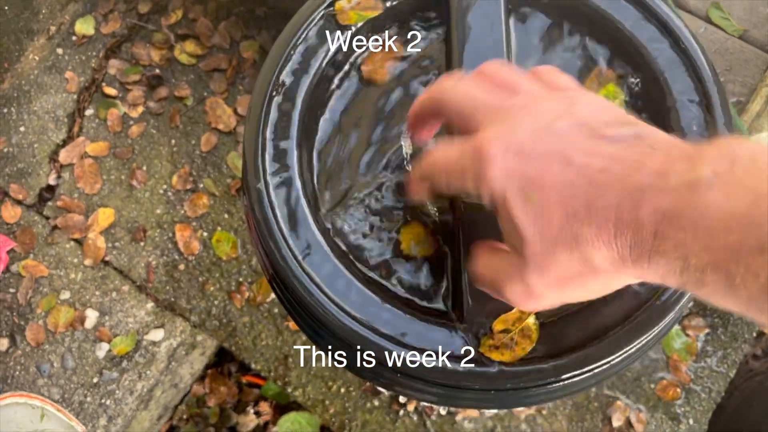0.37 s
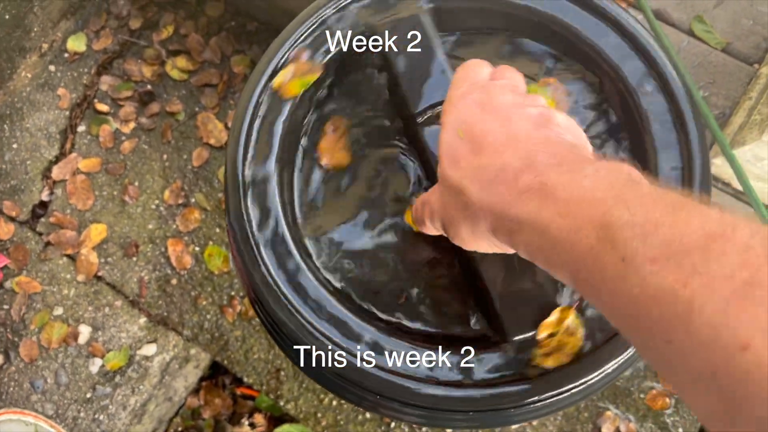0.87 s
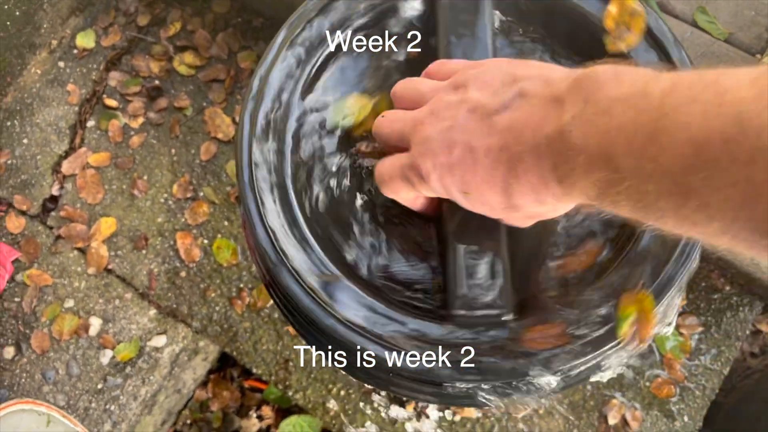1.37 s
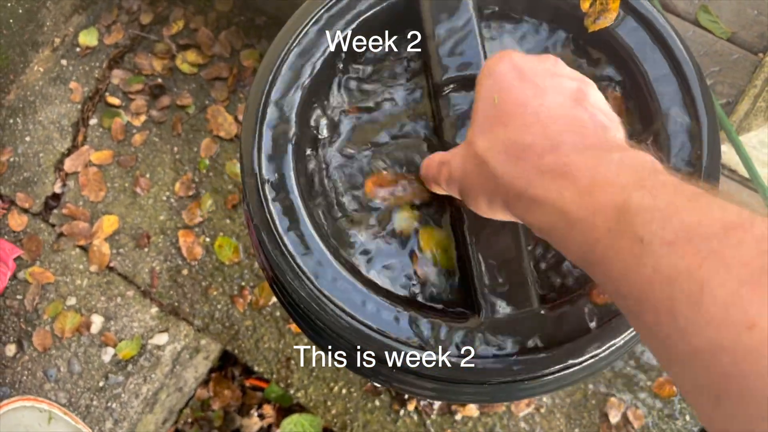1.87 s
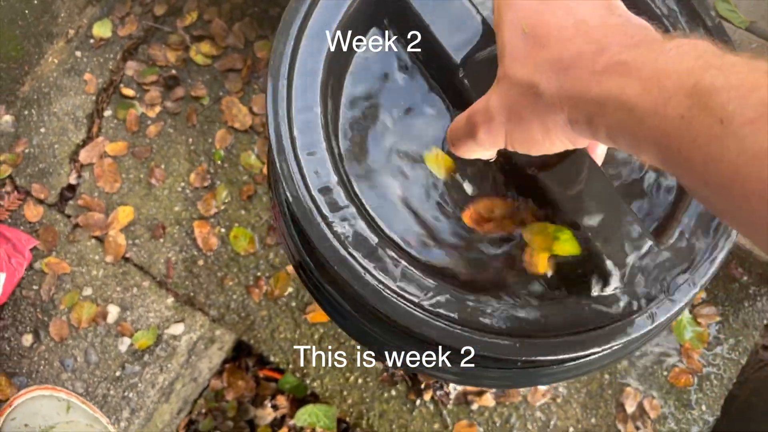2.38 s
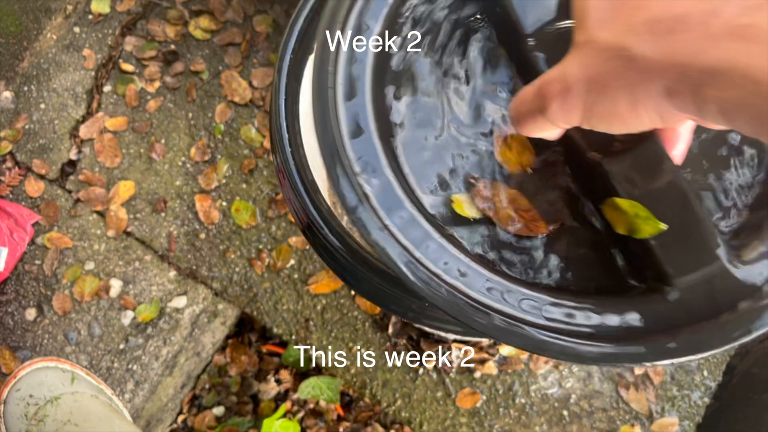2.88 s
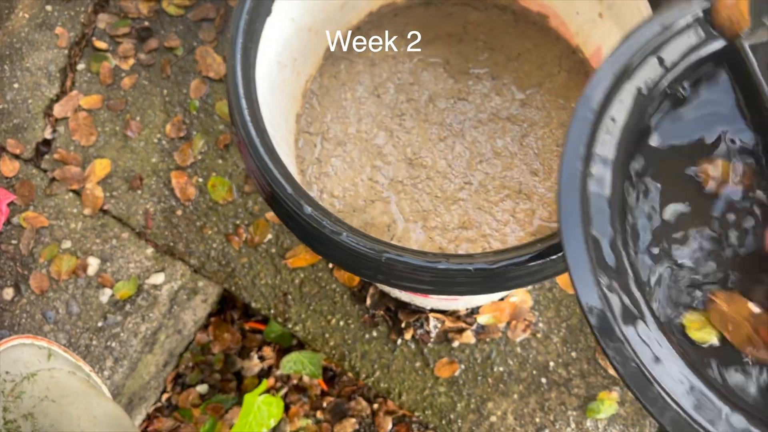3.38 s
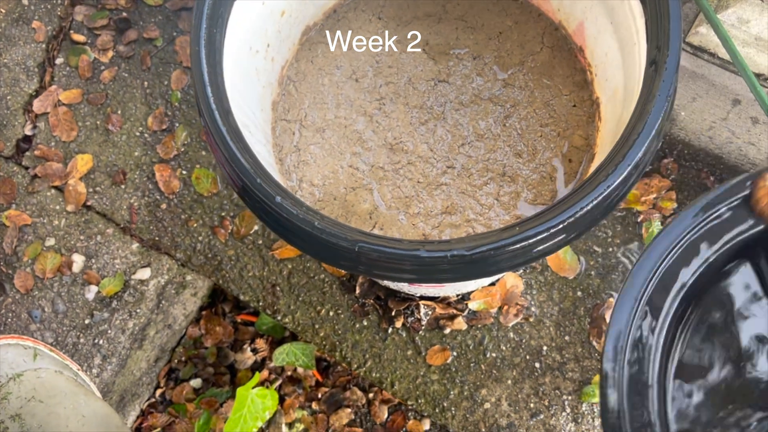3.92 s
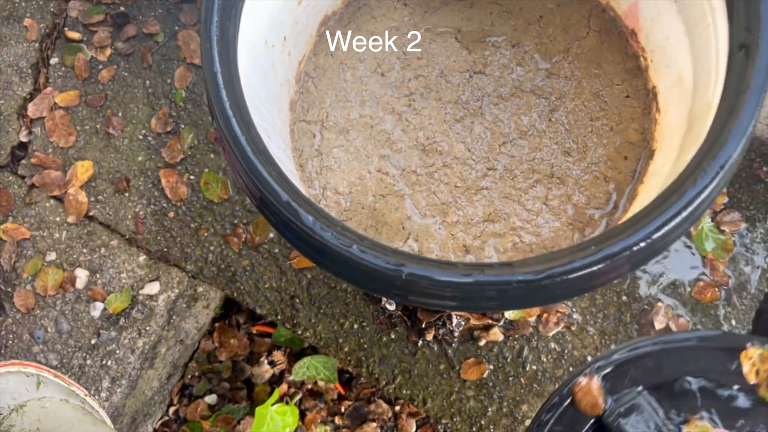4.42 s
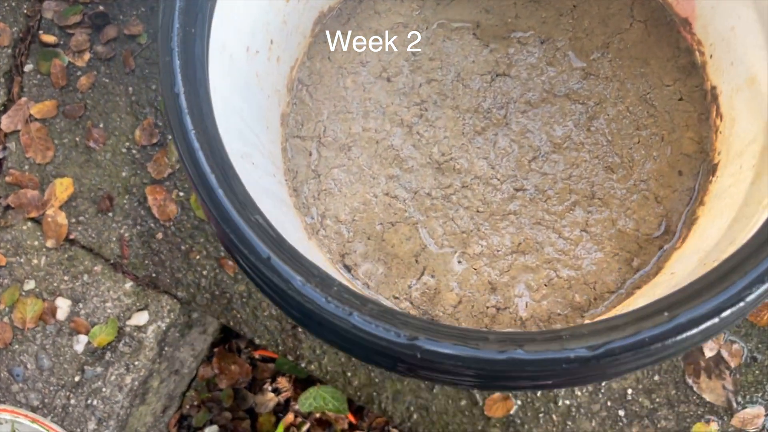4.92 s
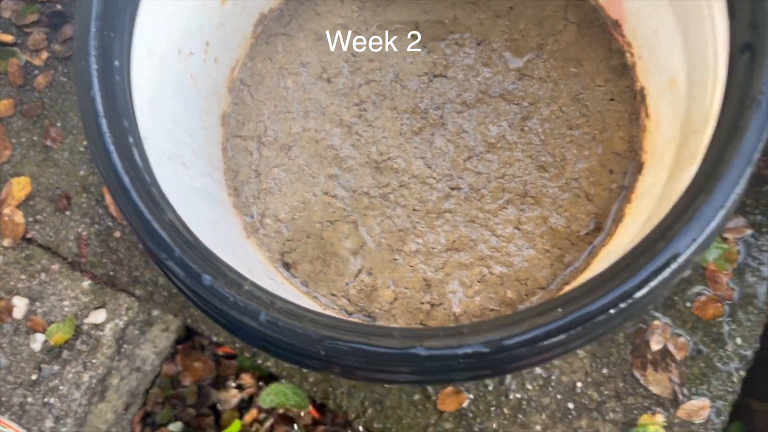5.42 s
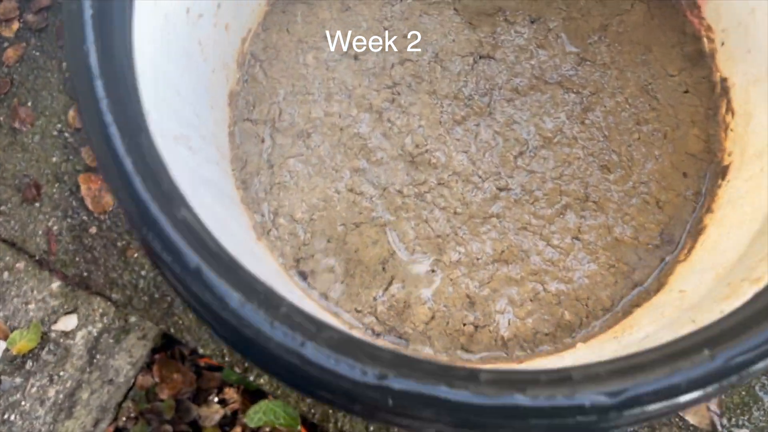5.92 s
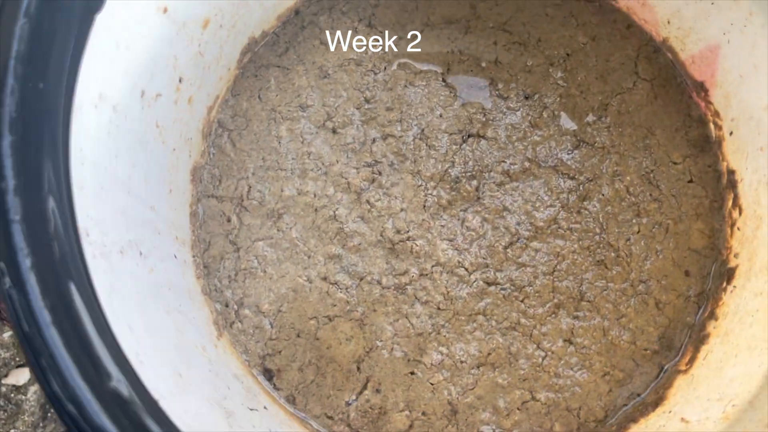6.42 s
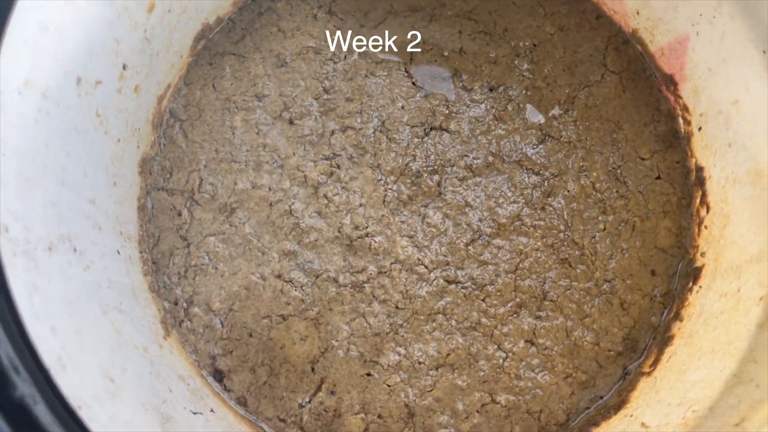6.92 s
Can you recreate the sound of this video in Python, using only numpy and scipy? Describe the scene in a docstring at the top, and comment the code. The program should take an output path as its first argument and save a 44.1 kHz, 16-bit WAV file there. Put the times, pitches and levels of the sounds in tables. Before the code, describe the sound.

Hand-held close view over a plastic bucket on wet paving, with traffic rumbling far off. Tail of a scrape and small drips first, then two quick squealing twists with drum-like thumps and splashing water. One more short rub ends in the hardest hollow knock. Water drips off the lifted lid, with a soft bump. Later the loose lid clatters and grinds on stone, settles fast, and the traffic softens.

```python
"""A wet screw lid is twisted on a plastic bucket outdoors: grit slips excite thread resonances, a sliding squeal
and bubbling water, and each knock rings the drum of the bucket and the hollow under the lid.
Water flies off and patters on wet paving as noise puffs, rising plops and sheets of crackle.
The lid drops and rattles to rest on stone: a ringing dish, rim modes, grinding grit, chatter, ticks and thuds.
Far traffic roars behind as shaped noise; two microphone ports hear the near sounds with unlike phase."""
import sys
import numpy as np
from scipy import signal
from scipy.fft import rfft, irfft
from scipy.io import wavfile
from scipy.ndimage import uniform_filter1d

SR = 44100
rng = np.random.default_rng(int(sys.argv[2]) if len(sys.argv) > 2 else 0)


def linear_from_db(decibels):
    """Turn decibels (scalar or array-like) into linear amplitude factors; 0 gives 1."""
    return 10 ** (np.asarray(decibels, float) / 20)


def generate_wav(sig):
    """Save sig (samples, or channels by samples) to the path in sys.argv[1] as 16-bit PCM at SR."""
    pcm = np.round(np.clip(np.atleast_2d(sig).T, -1, 1) * 32767).astype(np.int16)
    wavfile.write(sys.argv[1], SR, pcm)


N = 310684

# Levels in these tables are relative: the functions trim them when mixing.
# rub of the thread, one curve per twisting stroke: start_s, level_db
TWIST = [
    [(0.0, -45.5), (0.154, -60), (0.23, -72)],
    [(0.74, -69), (0.764, -55.5), (0.836, -49), (0.906, -50), (0.948, -41.5), (0.99, -45), (1.038, -39),
     (1.1, -42.5), (1.142, -58)],
    [(1.15, -56), (1.17, -55), (1.2, -49), (1.225, -50), (1.25, -44.5), (1.29, -42), (1.335, -38),
     (1.37, -45.5), (1.43, -58)],
    [(1.96, -63), (2.04, -51), (2.06, -49), (2.098, -62), (2.14, -61)],
]
# squeal of the thread, sliding with the grip: start_s, pitch_hz, level_db (against the scrape)
SQUEAL = [(0.0, 3480, -11), (0.8, 3930, -3), (0.88, 3820, -3), (0.935, 2800, -5), (0.98, 2990, -5),
          (1.02, 3610, -3.5), (1.05, 3780, 4.5), (1.085, 3400, -0.5), (1.2, 3470, -20), (1.3, 4960, -9),
          (1.34, 4830, 5), (1.4, 4400, -13), (2.04, 2950, 0)]
# thread resonances: centre_hz, width_hz (nominal), level_db (per Hz)
THREAD = [(1200, 120, 4.5), (1630, 260, 6), (2000, 240, 4), (2730, 450, 3), (3800, 840, 0.5),
          (4920, 320, 0), (6000, 1200, -6.5)]
# far traffic, what both ports share: freq_hz, level_db (per Hz)
TRAFFIC = [(20, -38), (36, -13), (70, -3.5), (110, -8.5), (150, -18.5), (236, -11.5), (310, -20),
           (420, -20), (620, -26), (800, -24), (1300, -25.5), (2000, -32), (2600, -43.5), (4000, -44.5)]
# far traffic, where the ports differ: freq_hz, level_db (per Hz)
TRAFFIC_WIDE = [(22, -6), (80, -12.5), (174, -14.5), (229, -12.5), (294, -13), (370, -13.5), (653, -8.5),
                (1300, -9), (1640, -10), (1800, -26), (2300, -29), (2700, -34), (4000, -36)]
# high background hiss, with a gap near 8 kHz and an end above 14 kHz, on the same scales:
# freq_hz, shared_db, wide_db
HISS = [(5200, -49, -41), (7400, -58, -43), (7900, -88, -43), (8700, -88, -44), (9300, -57, -47),
        (11000, -54, -52), (11800, -54, -70), (13000, -56, -54), (14300, -62, -56), (14800, -85, -62),
        (16000, -95, -85)]
# a nearer stream of traffic comes and goes: time_s, level_db
SWELL = [
    [(0, -0.5), (.7, 0.5), (1.5, 1.5), (2.9, 1), (3.4, 0.5), (3.9, 3.5), (4.4, -0.5), (5.7, -3.5),
     (6.2, -7), (7.04, -6.5)],
]
# clear drops, and snaps of the slipping thread:
# start_s, peak_db, pitch_hz (sets the puff's bands), top_db (fine treble)
PUFFS = [(0.0604, -52, 3690, -54), (0.196, -33, 3270, -63), (0.2164, -43, 3290, -63),
         (0.258, -55, 2500, -58), (0.3193, -39.5, 3630, -67), (0.357, -47, 3050, -72),
         (0.376, -46, 3630, -59), (0.44, -64, 6000, -68), (0.48, -61, 5000, -70), (0.5127, -49, 3970, -54),
         (0.538, -48, 5000, -68), (0.547, -46, 4800, -65), (0.5743, -45, 3780, -73),
         (0.61, -38.5, 5980, -64), (0.6355, -36.5, 5500, -57), (0.65, -41, 2950, -56),
         (0.9373, -30, 2690, -65), (1.0201, -33, 3580, -61), (1.035, -24.5, 3730, -59),
         (1.1925, -29, 2750, -69), (1.307, -21.5, 5170, -53), (1.3305, -19.5, 4460, -50),
         (1.374, -36, 4510, -43), (1.4456, -44, 4780, -55), (1.466, -34, 2900, -56),
         (1.473, -32.5, 4100, -45.5), (1.4852, -32.5, 3390, -47), (1.551, -40, 5640, -53),
         (1.5704, -42, 5460, -62), (1.612, -42, 7200, -41), (1.632, -43, 5940, -42),
         (1.646, -25, 4800, -38), (1.676, -34, 3900, -43), (1.695, -31, 6200, -53),
         (1.712, -28.5, 3200, -50), (1.78, -28.5, 3700, -48), (1.8088, -40, 4850, -63),
         (1.8795, -38.5, 3250, -62), (1.8914, -46, 2570, -52), (2.017, -47, 2600, -58),
         (2.0547, -25, 2680, -67), (2.075, -34, 3870, -70), (2.1304, -33.5, 6460, -43),
         (2.148, -62, 6000, -65), (2.192, -45, 2570, -51.5), (2.5, -42, 5400, -66),
         (2.622, -42.5, 6000, -64), (2.6724, -39.5, 6000, -64), (2.72, -42, 5760, -68),
         (2.761, -53, 2730, -54), (2.798, -36, 3120, -44), (2.822, -47, 6740, -55), (2.835, -36, 5950, -44),
         (2.877, -58, 6000, -56), (2.901, -62, 6500, -59), (2.925, -56, 6000, -64),
         (2.9343, -40, 2640, -61), (2.947, -42, 4550, -52), (2.98, -52, 7420, -48),
         (3.0087, -30.5, 7900, -51), (3.025, -42, 4320, -48), (3.062, -53, 2630, -56),
         (3.095, -61, 6000, -66), (3.1373, -57, 5500, -63), (3.148, -58, 6000, -63),
         (3.158, -56, 6000, -64), (3.251, -40.5, 3700, -66), (3.2828, -46, 6000, -60),
         (3.3506, -47, 5100, -73), (3.3841, -65, 6000, -80), (3.397, -44.5, 6600, -74),
         (3.4624, -67, 6000, -81), (3.479, -42, 5400, -74), (3.556, -32, 2770, -72),
         (3.711, -45, 4220, -69), (3.77, -51, 5000, -66), (3.83, -51, 5000, -65), (3.927, -62, 6000, -61),
         (3.9619, -41, 3970, -62), (4.288, -63, 5500, -72), (4.31, -66, 6000, -79), (4.32, -68, 6000, -78),
         (4.366, -64, 6000, -61), (4.374, -61, 5500, -58), (4.6084, -50, 3910, -62), (4.64, -66, 6000, -70),
         (4.675, -66, 6000, -76), (4.7, -56, 5800, -70), (4.913, -37.5, 2540, -60),
         (4.9367, -42, 5200, -59), (5.0796, -24, 5000, -28), (5.207, -19, 2530, -44),
         (5.6127, -56, 5940, -61), (5.653, -58, 3800, -70), (5.6596, -59, 6000, -63),
         (5.6775, -52, 6500, -60), (5.7738, -60, 6000, -64), (5.9804, -44.5, 2620, -61.5),
         (6.172, -66, 5600, -80), (6.238, -66, 6000, -62), (6.34, -66, 6000, -61), (6.367, -68, 6000, -68),
         (6.72, -54, 6500, -69), (6.765, -68, 6000, -66), (6.99, -68, 6000, -67)]
# plops, and two high ticks of the rattling lid:
# start_s, peak_db, pitch_hz, rise_per_s (half the climb, as share of the pitch)
PLOPS_AND_TICKS = [(0.995, -25, 321, 6.3), (1.242, -23, 1270, 6.8), (1.25, -25, 1257, 4.5),
                   (1.424, -29, 336, 3.2), (1.551, -26, 1520, 5.6), (1.607, -19, 1690, 6.3),
                   (1.626, -29.5, 486, 36), (1.779, -34, 1910, 5), (2.425, -22, 1088, 4),
                   (2.439, -29, 966, 6.4), (2.599, -23.5, 1400, 6.4), (2.73, -23.5, 1500, 4.3),
                   (2.798, -25, 1860, 5), (2.932, -27.5, 2600, 5), (4.884, -33, 834, 6.3),
                   (5.058, -42, 3360, 5), (5.364, -21, 4770, 5), (5.379, -20, 4600, 5),
                   (5.858, -28, 1760, 4.9)]
# sheets of water breaking on the ground: start_s, level_db, hold_s
SPRAY = [(1.44, -62, 0.039), (1.474, -60, 0.023), (1.53, -63, 0.047), (1.608, -55, 0.0091),
         (1.644, -46, 0.023), (1.713, -51.5, 0.0047), (1.781, -63, .01), (1.81, -71, 0.067),
         (2.13, -64, 0.0089), (2.76, -67, 0.02), (2.8, -62, 0.042), (2.94, -75, 0.019),
         (2.98, -61.5, 0.048)]
# faint small drips: time_s, rate_db (above one drip a second)
DRIPPING = [
    [(0, 26), (.7, 22), (1.9, 30), (2.2, -10), (2.75, -10), (2.85, 28), (3.1, 20), (3.4, -10), (4.8, -10),
     (5.5, 20), (5.8, -10), (7.04, -10)],
]
# lid knocks on bucket: start_s, crack_db, drum_hz, drum_db, hollow_db
KNOCKS = [(0.545, -40, 82, -31.5, -37), (0.574, -36, 64, -34, -38), (0.67, -50, 67, -53, -41.5),
          (1.088, -33, 73, -31, -38.5), (1.27, -38, 94.5, -20.5, -39), (1.281, -36, 95.6, -27, -33),
          (1.313, -44, 131, -49, -27.5), (1.334, -44, 70, -18, -29.5), (1.356, -46, 70, -20, -35),
          (1.422, -50, 102, -42, -35), (1.859, -52, 75.5, -33, -43.5), (2.055, -19, 130, -17.5, -16),
          (2.074, -29, 105, -17, -24.5), (2.148, -41, 147, -28, -50), (2.231, -36, 128, -42, -36.5),
          (2.355, -37, 59.6, -55, -35), (2.424, -39, 78, -42, -37), (3.553, -32.5, 63, -36, -31.5),
          (4.489, -40, 58.5, -33.5, -56)]
# modes of the lid plastic: pitch_hz, level_db, t60_s (undamped)
RIM = [(470, 1, 0.15), (581, 0, 0.083), (655, -4, 0.15), (820, -21.5, 0.28), (908, -4.5, 0.079),
       (1011, -1.5, 0.067), (1228, -2.5, 0.06), (1343, -7, 0.046), (1406, -9, 0.036), (1530, -15, 0.05),
       (1716, -10.5, 0.062), (1760, -18.5, 0.056), (1937, -11.5, 0.072), (2000, -30, 0.0082),
       (2100, -8.5, 0.029), (2390, -16, 0.039), (2500, -20, 0.077), (2930, -19, 0.026)]
# the loose lid bumps the bucket once, then bounces on stone:
# start_s, rim_db, centre_hz (of the blow), dish_db, dish_hz
BOUNCES = [(3.555, -31, 470, -24.5, 410), (4.9696, -17, 1870, -20, 307), (4.971, -15.5, 463, -20, 272),
           (4.984, -25.5, 452, -20, 334), (5.021, -25.5, 880, -32, 359), (5.037, -33, 470, -26.5, 370),
           (5.122, -23, 1800, -40, 330), (5.127, -7, 1860, -25, 340), (5.137, -16, 615, -19.5, 283),
           (5.152, -9.5, 465, -21.5, 393), (5.155, -10, 1730, -40, 297), (5.163, -19, 470, -22, 283),
           (5.181, -11.5, 660, -13.5, 282.6), (5.184, -15, 2000, -39, 302), (5.205, -23, 2250, -21, 282),
           (5.233, -25, 1240, -23, 380), (5.244, -1, 1060, -8.5, 283), (5.282, -22, 1300, -16.5, 278),
           (5.316, -21, 452, -35, 270), (5.3192, -13, 2720, -40, 290), (5.3224, -12, 2350, -28, 298),
           (5.327, -12, 1200, -6.5, 284), (5.364, -20.5, 1000, -36, 290), (5.375, -18, 560, -26, 241),
           (5.389, -21, 543, -25.5, 290), (5.433, -14.5, 1200, -28, 345), (5.442, -18.5, 1340, -22, 259),
           (5.4906, -24, 2390, -34, 258), (5.494, -17, 940, -30, 264), (5.5, -23, 590, -37, 296),
           (5.517, -28, 2600, -38, 320), (5.521, -30, 1110, -49, 320), (5.543, -30.5, 2000, -38, 302),
           (5.561, -28, 640, -35, 264), (5.603, -32, 603, -41, 376), (5.626, -32, 714, -51, 373)]
# drag of the dropped lid over the stone between bounces: time_s, level_db
SKID = [
    [(4.96, -71), (4.99, -53), (5.06, -43), (5.11, -42), (5.13, -28.5), (5.185, -31.5), (5.235, -41),
     (5.27, -47), (5.31, -43.5), (5.35, -56), (5.40, -39.5), (5.425, -46), (5.445, -32), (5.48, -56),
     (5.56, -53), (5.6, -80), (5.72, -74)],
]
# the two ports: freq_hz, lead_rad (right ahead of left), tilt_db (left louder)
PORTS = [(0, 0, 1.5), (430, 0.4, -2), (700, -0.5, -2), (1290, 0, 0.5), (1800, -0.4, 1), (2400, -0.3, 2),
         (2930, -1, 2), (4500, -0.4, 3.5), (5600, 0.9, 2), (6500, 1.1, 1), (7750, 2.7, 0), (8700, 3.2, 0),
         (9300, 4, 0), (11100, 6, -0.5), (13000, 6.7, 0), (14600, 9.2, 0), (22050, 10, 0)]
# reflections off ground and wall: lag_s, level_db
ECHOES = [(.0031, -8.5), (.0052, -23), (.0074, -7.5), (.013, -20), (.021, -18.5), (.029, -23)]


def rms_one(x):
    """Scale to unit power."""
    return x / np.sqrt(np.mean(x ** 2) + 1e-20)


def strokes(curves):
    """Gain over time of curves of (time_s, level_db); silent outside them."""
    t = np.arange(N) / SR
    gain = sum(linear_from_db(np.interp(t, *np.transpose(curve), -140, -140)) for curve in curves)
    return uniform_filter1d(gain, size=150)


def band(x, low_hz, high_hz):
    """Band-pass."""
    edges_hz = [low_hz, min(high_hz, .45 * SR)]
    return signal.sosfilt(signal.butter(2, edges_hz, "band", fs=SR, output="sos"), x)


def low_pass(x, order, cutoff_hz):
    """Low-pass."""
    return signal.sosfilt(signal.butter(order, cutoff_hz, fs=SR, output="sos"), x)


def coloured(spectrum):
    """Noise with the given spectrum; rms 1."""
    hz, level_db = np.transpose(spectrum)
    log_hz = np.log(np.fft.rfftfreq(N, 1 / SR) + 1)
    gain = linear_from_db(np.interp(log_hz, np.log(hz), level_db))
    return rms_one(irfft(rfft(rng.standard_normal(N)) * gain, N))


def grains(per_s, spread_db):
    """Random clicks of uneven size and either sign."""
    sizes = linear_from_db(spread_db * np.minimum(rng.exponential(1, N), 5)) * rng.choice([-1, 1], N)
    return sizes * (rng.random(N) < per_s / SR) + 1e-18


def flicker(rate_hz, depth_db):
    """Gain that wanders at random."""
    knots = rng.standard_normal(int(N / SR * rate_hz) + 2)
    return linear_from_db(depth_db * np.interp(np.arange(N) / SR * rate_hz, np.arange(len(knots)), knots))


def bursts(rows, t60_s):
    """Gain that jumps to each (start_s, level_db, hold_s), holds and dies away."""
    onset_db_per_s = 14000
    out = np.zeros(N)
    t = np.arange(SR // 2) / SR - .02   # begins ahead of the jump, to make room for the onset
    for start_s, level_db, hold_s in rows:
        onset_db = onset_db_per_s * np.minimum(t, 0)
        decay_db = 60 * np.maximum(t - hold_s, 0) / t60_s
        add(out, start_s + t[0], linear_from_db(level_db + onset_db - decay_db))
    return out


def dying(hz, t60_s, rise_s=.002, phase=0., sag=0.):
    """One struck mode with a soft contact; a hard-pushed membrane starts sharp by the share sag and settles."""
    t = np.arange(int(.5 * SR)) / SR
    turns = hz * (t + sag * 0.0081 * (1 - np.exp(-t / 0.0065)))
    return np.sin(2 * np.pi * turns + phase) * 10 ** (-3 * t / t60_s) * (1 - np.exp(-t / rise_s))


def add(out, start_s, x):
    """Mix x in at its start time."""
    i = round(start_s * SR)
    out[i:i + len(x)] += x[:N - i]


def slosh():
    """Bubbles burst in the stirred water, each ringing a few cycles at its own pitch; rms 1."""
    pops_per_s, cycles = 800, 24.0   # cycles until a bubble has fallen 60 dB
    pops = grains(pops_per_s, 3.1)
    dealt = rng.integers(0, 16, N)   # which pitch each pop gets
    out = 0
    for k, hz in enumerate(np.geomspace(1000, 4800, 16)):
        radius = linear_from_db(-60 * hz / (cycles * SR))
        w = 2 * np.pi * hz / SR
        resonator = [1, -2 * radius * np.cos(w), radius * radius]
        out = out + signal.lfilter([np.sin(w)], resonator, pops * (dealt == k) + 1e-18)
    return rms_one(out)


def squeal(slips):
    """The slips, low-passed and carried on a sliding sine, sound like one resonance whose centre slides."""
    width_hz = 770
    start_s, pitch_hz, level_db = np.transpose(SQUEAL)
    t = np.arange(N) / SR
    sway = rms_one(low_pass(slips, 2, width_hz / 2))
    carrier = np.sin(2 * np.pi * np.cumsum(np.interp(t, start_s, pitch_hz)) / SR)
    return linear_from_db(np.interp(t, start_s, level_db)) * sway * carrier


def twist():
    """Grit slips along the thread into its resonances, each wavering alone, and shakes the drum of the bucket."""
    film_db, slosh_db = -6.5, -1   # wet film and stirred water, against the scrape
    drum_db, firm_rub_db, drum_follows = -38, -40, 0.6   # drum at a firm rub; its share of the rub's swing
    slips = grains(3000, 2.1) * flicker(60.4, 2.1)
    scrape = 0
    for hz, width, db in THREAD:
        resonance = rms_one(band(slips, hz - 0.45 * width, hz + 0.5 * width))
        scrape = scrape + linear_from_db(db) * flicker(40.0, 2.1) * resonance * np.sqrt(width)
    film = rms_one(band(grains(8600, 1.4) * flicker(49.7, 0.62), 5300, 10900))
    drum = rms_one(band(rng.standard_normal(N), 52, 116)) + linear_from_db(-1.5) * rms_one(band(slips, 184, 280))
    rub = strokes(TWIST)
    thread = rms_one(scrape) + squeal(slips) + linear_from_db(slosh_db) * slosh() + linear_from_db(film_db) * film
    return rub * thread + linear_from_db(drum_db) * (rub / linear_from_db(firm_rub_db)) ** drum_follows * drum


def traffic():
    """Far roar and hiss of shaped noise: the bass throbs, the middle drifts, the treble rises and sinks slowly."""
    shared_db, wide_db, left_db = -38, -43.5, 1   # the shared roar leans to the left
    bass_follows, middle_follows = 0.023, 0.39   # share of the swell heard below and above its own band
    mid = coloured(TRAFFIC + [(hz, shared) for hz, shared, wide in HISS])
    side = coloured(TRAFFIC_WIDE + [(hz, wide) for hz, shared, wide in HISS])
    swell = strokes(SWELL)
    # adding a band times (gain - 1) turns that band up or down
    mid = mid + band(mid, 40, 344) * (swell ** bass_follows * flicker(12, 2.4) - 1)
    middle = band(mid, 286, 565) * (swell - 1)
    upper = band(mid, 950, 1770) * (swell ** middle_follows * flicker(1.39, 0.27) - 1)
    mid = mid + middle + upper
    mid = mid + band(mid, 3200, 16000) * (linear_from_db(-7) * flicker(2.5, 3.0) - 1)
    lean_db = left_db * np.array([[.5], [-.5]])
    return linear_from_db(shared_db + lean_db) * mid + linear_from_db(wide_db) * side * [[1], [-1]]


def puffs():
    """Clear drops and thread snaps: each bursts as a short noise puff whose fine top dies first."""
    body_t60_s, top_t60_s = 0.026, 0.013
    first_click = 0.79   # against the spread of the puff
    out, t = np.zeros(N), np.arange(int(.1 * SR)) / SR
    decay = 10 ** (-3 * t / [[body_t60_s], [top_t60_s]])
    rise = 1 - np.exp(-t / [[0.0009], [0.0003]])
    for start_s, peak_db, hz, top_db in PUFFS:
        puff = rng.standard_normal((2, len(t))) * decay * rise
        puff[:, 0] = first_click
        body = band(band(puff[0], hz / 1.52, hz * 1.09), hz / 0.71, hz * 4.4)
        top = band(puff[1], 7100, 12700)
        body = linear_from_db(peak_db - 2.5) * body / np.abs(body).max()
        add(out, start_s, body + linear_from_db(top_db + 16.0) * top / np.abs(top).max())
    return out


def plops_and_ticks():
    """Plops and two high lid ticks: each rings as a rough sine that climbs in pitch while it dies."""
    out, t = np.zeros(N), np.arange(int(.1 * SR)) / SR
    for start_s, peak_db, hz, rise in PLOPS_AND_TICKS:
        rough = 1 + 2.6 * band(rng.standard_normal(len(t)), 75, 970)
        tone = np.sin(2 * np.pi * hz * t * (.96 + rise * t))
        envelope = np.exp(-t * hz / 10.0) * (1 - np.exp(-t / 0.00057))
        add(out, start_s, linear_from_db(peak_db - 9.5) * rough * tone * envelope)
    return out


def spray():
    """Sheets of water break into clumped crackle."""
    crackle = grains(4400, 3.8) * flicker(71, 0.79)
    sheet = band(crackle, 3000, 12500) + linear_from_db(-7.0) * band(crackle, 2260, 4200) * flicker(31.5, 1.2)
    return linear_from_db(8.5) * bursts(SPRAY, 0.15) * rms_one(sheet)


def patter():
    """Faint drips all round: random clicks smeared into short decays that gate bright noise."""
    level_db, t60_s = -76, 0.013
    drips = grains(SR, 0.32) * (rng.random(N) < strokes(DRIPPING) / SR)
    clicks = band(band(drips, 2600, 13000), 2600, 14000)
    envelope = signal.lfilter([1], [1, -linear_from_db(-60 / (t60_s * SR))], np.abs(clicks))
    return linear_from_db(level_db) * rms_one(envelope * band(rng.standard_normal(N), 4400, 12200))


def rim_ring(luck, damping, centre_hz):
    """All plastic modes, strongest near where the blow excites, over a short dull crack; peak 1."""
    focus_db_per_octave, luck_db = 16.5, 3   # how narrowly a blow picks its modes; chance per mode
    ring = 0
    for k, (hz, db, t60_s) in enumerate(RIM):
        level_db = db + luck_db * luck[k] - focus_db_per_octave * abs(np.log2(hz / centre_hz))
        ring = ring + linear_from_db(level_db) * dying(hz, t60_s * damping, 0.0036, 3 * luck[-k - 1])
    crack = band(rng.standard_normal(len(ring)), 360, 1.68 * centre_hz + 1200)
    crack = band(crack, 440, 0.41 * centre_hz + 2000)
    crack = crack * 10 ** (-3 * np.arange(len(ring)) / SR / 0.043)
    blow = ring / np.abs(ring).max() + linear_from_db(1.0) * crack
    return blow / np.abs(blow).max()


def knocks():
    """Each knock rings the deep drum, the hollow under the lid with its neighbours and, briefly, the plastic."""
    hollow_hz, depth_hz = 249.2, 72   # hollow under the lid; air column of the bucket
    # modes of the hollow: ratio, level_db, t60_s
    hollow_modes = [(1, 7.0, 0.14), (0.757, 5.0, 0.068), (1.117, -6.5, 0.11),
                    (1.824, -2, 0.036), (2.864, -6, 0.061)]
    out, luck = np.zeros(N), rng.standard_normal((len(KNOCKS), 40))
    for (start_s, crack_db, drum_hz, drum_db, hollow_db), row in zip(KNOCKS, luck):
        add(out, start_s, linear_from_db(crack_db) * rim_ring(row, 0.26, 1770))
        add(out, start_s, linear_from_db(drum_db + 8.0) * dying(drum_hz, 0.13, 0.0045, sag=0.067))
        add(out, start_s, linear_from_db(drum_db + 5) * dying(depth_hz, 0.21, 0.0084))
        for ratio, db, t60_s in hollow_modes:
            mode = dying(hollow_hz * ratio * (1 + 0.044 * row[1]), t60_s, 0.0013, sag=0.25)
            add(out, start_s, linear_from_db(hollow_db + db + 1.66 * row[0]) * mode)
    return out


def lid_blows():
    """At each blow dish and rim sound; both ring freely for a short fixed time, then are choked."""
    free_ring_s = 0.0517
    out, luck = np.zeros(N), rng.standard_normal((len(BOUNCES), 40))
    for (start_s, rim_db, centre_hz, dish_db, dish_hz), row in zip(BOUNCES, luck):
        dish = dying(dish_hz, 0.17, 0.0021)
        dish = dish + linear_from_db(-15) * dying(dish_hz * 0.728, 0.09, 0.017)
        dish = dish + linear_from_db(-10.0) * dying(dish_hz * 1.4, 0.1, 0.0047)
        choked_s = np.maximum(np.arange(len(dish)) / SR - free_ring_s, 0)
        ring = linear_from_db(dish_db + 3.5) * dish + linear_from_db(rim_db) * rim_ring(row, 0.55, centre_hz)
        add(out, start_s, ring * np.exp(-choked_s / 0.0011))
    return out


def lid_rattle():
    """Gritty, wet grind and rim buzz follow the drag curve and the bounces; thuds follow the bounces."""
    scuff_db, scuff_follows = -37.5, 0.43   # grind that each bounce adds; share of the rim level's swing
    scuff_t60_s = 0.0075   # before scuff_follows stretches it
    wet_db, drying_db_per_s = 0.5, 15.5   # water film against the grind at landing; it is thrown off
    chatter_db, chatter_t60_s = -27.5, 0.31   # rim buzz after each bounce
    thud_db, thud_t60_s = -11.5, 0.16   # ground thud after each bounce
    settling_db_per_s = 52   # thuds weaken as the lid lies flatter
    landing_s = 4.97
    grit = grains(4000, 3.1) * flicker(81, 3.3)
    wet = grains(7000, 3.8) * flicker(90, 3.0)   # the water film tears finer than the grit
    grind = band(grit, 1930, 5950) + linear_from_db(-7.5) * band(grit, 5550, 8500)
    grind = rms_one(grind + linear_from_db(-8) * band(grit, 3250, 3260) * flicker(24.6, 1.5))
    film = rms_one(band(wet, 6600, 13400))
    chatter = rms_one(sum(linear_from_db(db) * rms_one(band(grit, hz / 1.05, hz * 1.05)) for hz, db, t60_s in RIM))
    thud = rms_one(band(rng.standard_normal(N), 45, 183))
    blows = [(start_s, rim_db, 0) for start_s, rim_db, *rest in BOUNCES]
    since_s = np.clip(np.arange(N) / SR - landing_s, 0, 1)
    drag = strokes(SKID)
    scuff = linear_from_db(scuff_db) * bursts(blows, scuff_t60_s) ** scuff_follows
    out = (drag + scuff) * grind
    out = out + linear_from_db(wet_db - drying_db_per_s * since_s) * (drag + linear_from_db(3) * scuff) * film
    out = out + (linear_from_db(chatter_db) * bursts(blows, chatter_t60_s) + linear_from_db(-6) * drag) * chatter
    return out + linear_from_db(thud_db - settling_db_per_s * since_s) * bursts(blows, thud_t60_s) * thud


def dropped_lid():
    """The loose lid rings at each blow and rattles over the stone between them."""
    return lid_blows() + lid_rattle()


def ports(x):
    """A near sound reaches the two ports with unlike phase and level; its echoes arrive from the sides."""
    hz, lead_rad, tilt_db = np.transpose(PORTS)
    grid_hz = np.fft.rfftfreq(N, 1 / SR)
    half = linear_from_db(np.interp(grid_hz, hz, tilt_db) / 2) * np.exp(-.5j * np.interp(grid_hz, hz, lead_rad))
    out = irfft(rfft(x) * [half, 1 / half], N)
    dull = band(band(x, 620, 2300), 410, 2300) + linear_from_db(1.5) * band(x, 3300, 7100)
    dull = dull + linear_from_db(-2) * band(band(x, 11000, 14000), 10000, 18000)
    for k, (lag_s, db) in enumerate(ECHOES):   # sides alternate; the far port hears it inverted and weaker
        add(out[k % 2], lag_s, linear_from_db(db) * dull)
        add(out[1 - k % 2], lag_s, -linear_from_db(db - 10.0) * dull)
    return out


def scene():
    """Bucket, lid and water close by, traffic far off."""
    water = puffs() + plops_and_ticks() + spray() + patter()   # with the thread snaps and lid ticks
    return ports(twist() + water + knocks() + dropped_lid()) + traffic()


def top_cut(x):
    """Nothing passes above the cut-off."""
    return signal.sosfilt(signal.butter(12, 16530, fs=SR, output="sos"), x)


def record(dry):
    """The microphone rolls off at both ends and its peaks are rounded."""
    low_hz, top_hz = 40.2, 16100
    heard = low_pass(dry, 6, top_hz)
    heard = signal.sosfilt(signal.butter(2, low_hz, "high", fs=SR, output="sos"), heard)
    return top_cut(1.253 * np.tanh(heard / 1.349))


dry = scene()
out = record(dry)
generate_wav(out)
```